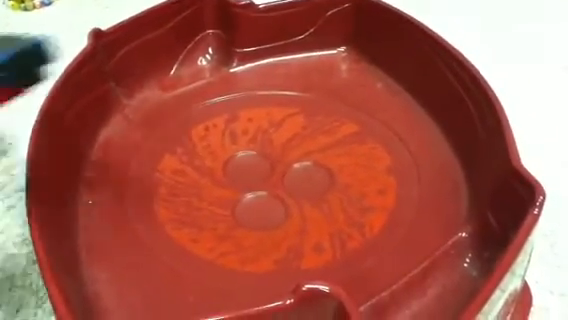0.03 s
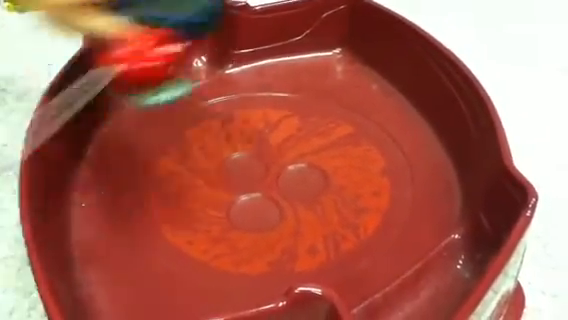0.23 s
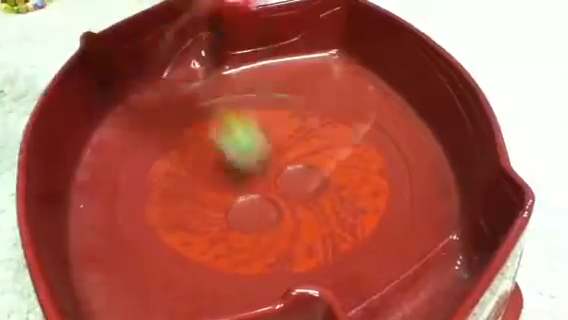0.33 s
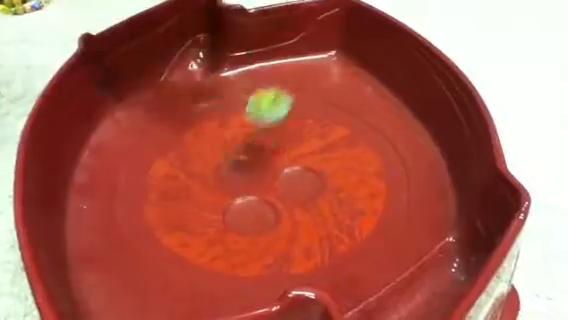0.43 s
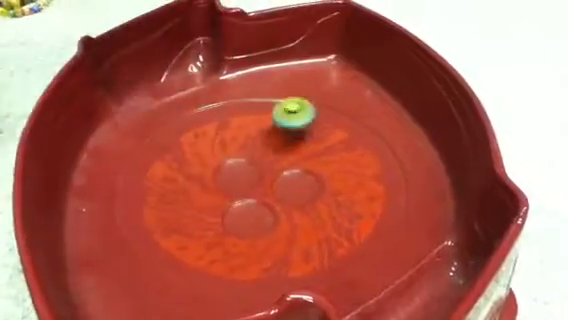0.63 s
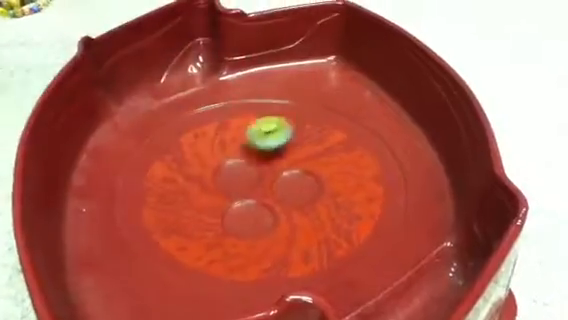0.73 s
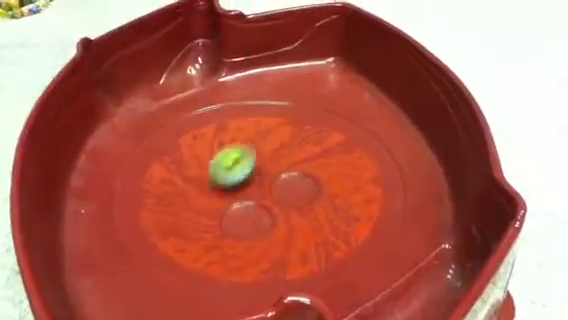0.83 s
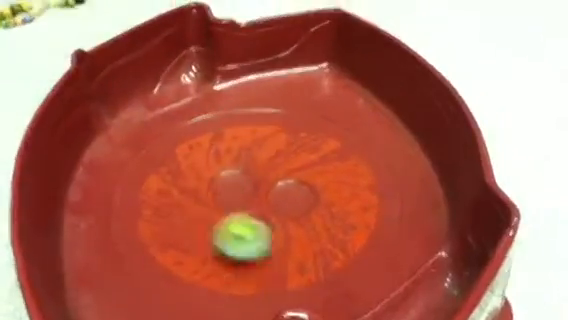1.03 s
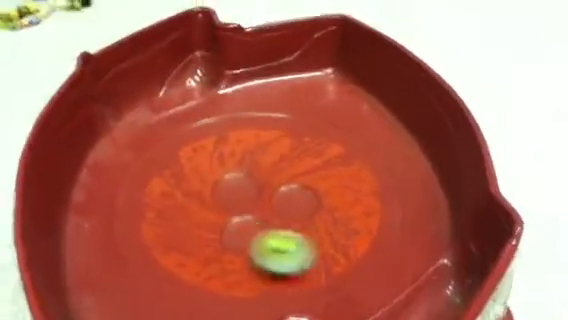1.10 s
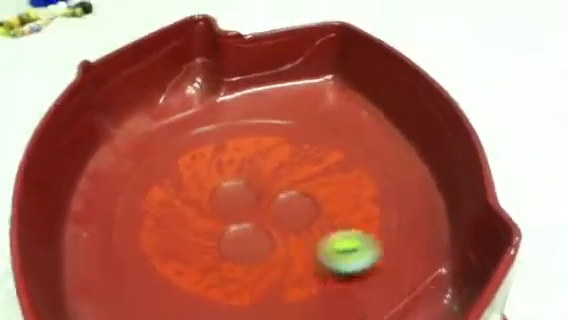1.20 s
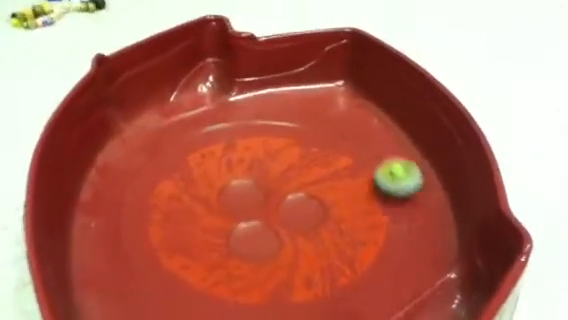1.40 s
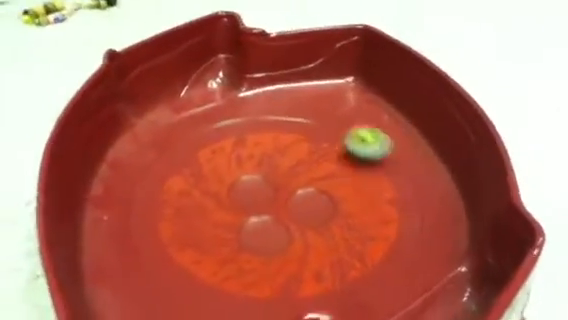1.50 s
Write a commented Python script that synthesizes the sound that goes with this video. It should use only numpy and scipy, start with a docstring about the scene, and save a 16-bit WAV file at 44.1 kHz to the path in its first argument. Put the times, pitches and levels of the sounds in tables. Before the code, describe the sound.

A toy top rips off its launcher, then clacks and spins around a plastic dish.

```python
"""A rising whine and rasp: a ripcord's teeth run through a toy launcher, whose gears then rattle on.
The spinning top drops into a thin plastic dish, bounces ever lower, skitters and circles on its tip.
The dish drums and rumbles, the top's loose parts jingle, its metal wheel rings faintly,
and a small quiet room answers."""
import sys
import numpy as np
from scipy import signal
from scipy.fft import rfft, irfft
from scipy.io import wavfile
from scipy.ndimage import uniform_filter1d

SR = 44100
rng = np.random.default_rng(int(sys.argv[2]) if len(sys.argv) > 2 else 0)


def wrap_up_sound(samples):
    """Save the sound to the file named by the first command line argument, as 16-bit audio."""
    columns = np.atleast_2d(samples).T
    # keep every value between -1 and 1, then stretch to whole-number steps
    tamed = np.clip(columns, -1, 1)
    steps = np.round(tamed * 32767).astype(np.int16)
    wavfile.write(sys.argv[1], SR, steps)


N = 68355
T = np.arange(N) / SR

# spectra of cord rasp and gear snap (frequency [Hz], level [dB])
RASP_SPECTRUM = [(100, -24), (350, -24.5), (700, -21.5), (1200, -5), (2200, -1.5), (4000, 0.5), (6000, -3),
                 (9000, -4), (12500, -13.5), (16000, -33)]
SNAP_SPECTRUM = [(60, -60), (450, -41), (850, -20.5), (1600, 6.5), (2600, -3), (4700, 3), (5400, -2.5),
                 (7000, -1.5), (9500, -4), (12500, -15.5), (16000, -29)]
# tip strikes (time [s], floor boom [dB], shell knock [dB], tick [dB], spot pitch [Hz], wheel [dB])
STRIKES = [(0.425, -6, -15.5, -20.5, 1290, -62), (0.4282, -24, -12.5, -41, 1541, -62),
           (0.4378, -44, -15, -21, 719, -62), (0.6453, -11, -24.5, -26.5, 1232, -51.5),
           (.7760, -19.5, -26, -25.5, 1516, -75), (0.8546, -31, -24.5, -38, 1590, -50),
           (0.8571, -31, -37, -23.5, 1560, -62), (0.874, -28.5, -52, -30, 1090, -57),
           (.9090, -18.5, -26, -26.5, 1145, -53), (0.915, -27, -57, -30, 1090, -48),
           (0.9436, -61, -26, -59, 550, -54), (0.9458, -52, -25, -20.5, 550, -43),
           (0.9552, -38, -26.5, -26, 540, -62), (1.0035, -36, -30, -39, 710, -68),
           (1.010, -58, -28.5, -34.5, 1375, -67), (1.053, -29.5, -20.5, -37, 1215, -55),
           (1.074, -30, -32, -42, 1270, -63), (1.078, -23.5, -26.5, -27.5, 1806, -61),
           (1.087, -61, -25, -26, 1123, -61), (1.096, -26.5, -30, -21.5, 1980, -50.5),
           (1.099, -34, -30.5, -25, 1830, -40), (1.140, -50, -27, -26, 1310, -66),
           (1.181, -55, -29.5, -29, 1290, -70), (1.206, -57, -32.5, -28.5, 1230, -55),
           (1.3751, -31, -24.5, -17, 1230, -46.5), (1.41, -64, -25, -21, 850, -61),
           (1.4149, -43, -24.5, -19, 1454, -43.5), (1.448, -37, -26, -28.5, 803, -68),
           (1.491, -60, -58, -32, 564, -57)]
# modes of the dish and of the top's loose parts (frequency [Hz], level [dB], t60 [s])
DISH_MODES = [(108, -12, .08), (150, -9, .11), (188, -13, .08), (227, -2.5, .115), (262, -9, .1),
              (325, -16, .14), (435, -19, .12), (540, -10, .09), (642, -8, .08), (730, -7, .08),
              (812, -9, .07), (1080, -8, .05), (1230, -6, .045), (1540, -9, .045)]
PART_MODES = [(3970, -6, 0.031), (7120, 1.5, 0.014), (7290, -3, 0.033), (8200, -4, 0.052), (8600, 3, 0.007),
              (9700, -32, 0.042), (12200, -8, 0.08), (12830, -5.5, 0.05), (13400, -23, 0.049),
              (13940, -16, 0.073)]


def undb(db):
    """Decibels to gain."""
    return 10 ** (np.asarray(db) / 20)


def unit(x):
    """Scale to rms 1."""
    return x / np.sqrt(np.mean(x ** 2))


def curve(rows, column=1):
    """Gain along (time [s], level [dB]) rows, fading in before the first."""
    rows = np.array(rows)
    fade_in = np.exp(np.minimum(T - rows[0, 0], 0) * 100)
    return undb(np.interp(T, rows[:, 0], rows[:, column])) * fade_in


def colour(x, spectrum):
    """Filter by (frequency [Hz], level [dB]) points; rms 1."""
    hz, db = np.array(spectrum).T
    bins_hz = np.maximum(np.fft.rfftfreq(N, 1 / SR), 1)
    return unit(irfft(rfft(x) * undb(np.interp(np.log(bins_hz), np.log(hz), db)), N))


def noise(spectrum):
    """Coloured noise, rms 1."""
    return colour(rng.standard_normal(N), spectrum)


def tinted(spectrum, count=40, spread_db=4):
    """Coloured noise with random peaks and dips."""
    hz, db = np.array(spectrum).T
    grid_hz = np.geomspace(hz[0], hz[-1], count)
    grid_db = np.interp(np.log(grid_hz), np.log(hz), db) + spread_db * rng.standard_normal(count)
    return noise(np.c_[grid_hz, grid_db])


def wander(hz):
    """Smooth random drift, rms 1."""
    size = int(SR / hz)
    return unit(uniform_filter1d(uniform_filter1d(rng.standard_normal(N), size), size))


def grains(per_s, spread_db=3.5):
    """Tiny random impacts of unequal size."""
    hits = (rng.random(N) < per_s / SR) * rng.choice([-1, 1], N)
    return hits * undb(spread_db * rng.standard_normal(N))


def fade(start_s, t60_s):
    """Step onset, exponential decay."""
    return (T >= start_s) * np.exp(-np.log(1000) * np.maximum(T - start_s, 0) / t60_s)


def burst(start_s, t60_s, contact_s=0.00037):
    """Decay with its onset rounded by the contact time."""
    return fade(start_s, t60_s) * (1 - np.exp(-np.maximum(T - start_s, 0) / contact_s))


def ring(modes):
    """Impulse response of (frequency [Hz], level [dB], t60 [s]) modes."""
    out = np.zeros(N)
    for hz, db, t60_s in modes:
        t = T[T < 2 * t60_s]
        out[:len(t)] += undb(db) * np.exp(-np.log(1000) * t / t60_s) * np.sin(2 * np.pi * hz * t)
    return out


def through(x, response):
    """Convolve, cut to N."""
    return signal.fftconvolve(x, response)[:N]


def ripcord(jitter=.058, flutter_db=4, bright_hz=1395, mesh_depth=0.37, release_t60_s=0.15):
    """Uneven teeth whine in the housing and rasp while the cord runs."""
    # cord speed (time [s], tooth rate [Hz])
    speed = [(.10, 1143), (.18, 1170), (.213, 1291), (.236, 985.3), (.252, 1246), (.262, 1415),
             (.278, 1710), (.294, 2050), (.335, 2510)]
    # pull on the cord (time [s], rasp [dB], whine [dB])
    pull = [(.07, -78, -71), (.13, -51, -51), (.165, -42.5, -47.5), (.19, -34.5, -28), (.217, -28, -28.5),
            (.242, -20.5, -23), (.258, -22, -15.5), (.295, -17, -23), (.315, -17, -22.5),
            (.331, -15, -24.5), (.348, -30, -59)]
    # tooth harmonics from the fundamental up (level [dB])
    harmonics_db = [6, -0.5, -1.5, 1]
    # housing resonances (frequency [Hz], level [dB], t60 [s])
    housing_modes = [(1220, 3.5, 0.0054), (1320, -2.5, 0.0058), (1620, -19, 0.0088), (2180, -3.5, 0.0128),
                     (2270, -6, 0.025), (2843, 3.5, 0.023), (3400, 8, 0.0083), (3830, -2, 0.019),
                     (4660, -10, 0.016)]
    tooth_hz = np.interp(T, *np.array(speed).T)
    phase = 2 * np.pi * np.cumsum(tooth_hz * (1 + jitter * wander(890))) / SR
    brightness = np.minimum(tooth_hz / bright_hz, 1) ** 10  # overtones grow with speed
    teeth = sum(brightness ** k * undb(db + flutter_db * wander(490)) * np.sin((k + 1) * phase)
                for k, db in enumerate(harmonics_db))
    housing = through(np.gradient(teeth), ring(housing_modes))
    release_s = pull[-1][0]
    pulling = T < release_s
    whine = (housing / np.std(housing[pulling]) + undb(-3.5) * teeth / np.std(teeth[pulling])) / 2 ** .5
    meshing = (1 + mesh_depth * np.cos(phase)) ** 2
    rasp = unit(colour(rng.standard_normal(N) * meshing, RASP_SPECTRUM) * undb(1.5 * wander(220)))
    engaged = pulling + fade(release_s, release_t60_s)
    return engaged * (rasp * curve(pull) + whine * curve(pull, column=2))


def clacks():
    """The launcher clacks: noise bursts, each with its own brightness."""
    # launcher clacks (time [s], level [dB], t60 [s], tilt [dB/octave])
    hits = [(0.091, -47.5, 0.037, -1.5), (0.324, -9.5, 0.068, 3.4), (0.495, -25.5, 0.062, 0.5),
            (0.5533, -6, .013, 5.4), (0.5655, -7, 0.0085, 12)]
    out = np.zeros(N)
    for start_s, level_db, t60_s, tilt in hits:
        spectrum = [(hz, db + tilt * np.log2(hz)) for hz, db in SNAP_SPECTRUM]
        out += undb(level_db) * burst(start_s, t60_s) * noise(spectrum)
    return out


def catches(sigma_s=0.0027, grit_hz=910):
    """The cord catches on the pinion; the housing gives a gritty squeak."""
    # catches (time [s], level [dB], squeak pitch [Hz])
    snags = [(0.2288, -18, 2380), (0.2705, -14, 3640), (0.2925, -12.5, 4080), (0.3272, -23, 4680)]
    out = np.zeros(N)
    for peak_s, db, hz in snags:
        squeak = np.sqrt(2) * np.sin(2 * np.pi * hz * T + wander(grit_hz))
        envelope = undb(db) * np.exp(-.5 * ((T - peak_s) / sigma_s) ** 2)
        out += envelope * (squeak + undb(-3) * noise(RASP_SPECTRUM))
    return out


def freewheel(stop_t60_s=0.15):
    """The released gears coast in a dense rattle."""
    # coasting gears (time [s], level [dB])
    levels = [(.32, -36), (.35, -29), (.39, -40.5), (.42, -31), (.47, -40.5), (.53, -38.5), (.555, -33.5),
              (.59, -42)]
    stop_s = levels[-1][0]
    running = (T < stop_s) + fade(stop_s, stop_t60_s)
    return colour(grains(6000), SNAP_SPECTRUM) * curve(levels) * running


def dish_strikes(floor_below_hz=480, spread_db=2, thud_hz=208.3, lag_s=0.001102):
    """Each landing rings the struck spot; just after, the floor flexes and the dish's modes ring."""
    shapes = np.array([ring([mode]) for mode in DISH_MODES])
    is_floor = np.array(DISH_MODES)[:, 0] < floor_below_hz
    alternating = (-1) ** np.arange(len(DISH_MODES))
    thud = ring([(thud_hz, -3.5, 0.045)])
    out = np.zeros(N)
    for start_s, boom_db, knock_db, _, spot_hz, _ in STRIKES:
        scatter = rng.standard_normal(len(DISH_MODES))
        gains = undb(np.where(is_floor, boom_db - 12, knock_db - 6.5) + spread_db * scatter)
        signs = np.where(is_floor, alternating, -np.sign(scatter[::-1]))
        body = (gains * signs) @ shapes - undb(boom_db) * thud
        strike = ring([(spot_hz, knock_db + 2, .04)]) + np.interp(T - lag_s, T, body)
        i = int(start_s * SR)
        out[i:] += strike[:N - i]
    return out


def dish_wash(knock_t60_s=0.038, hollow_t60_s=0.16):
    """The struck dish's many overlapping modes blur into a knock and a hollow after-ring."""
    # spectra of shell knock and after-ring (frequency [Hz], level [dB])
    shell_spectrum = [(100, -1.5), (220, 9), (380, -4.5), (650, 3.5), (920, 0), (1250, 3.5), (1700, 0),
                      (2200, -5), (2800, -2), (5000, -21.5), (10000, -36)]
    hollow_spectrum = [(60, -1), (150, -2.5), (260, 2.5), (400, -5), (700, -7), (1500, -23), (3000, -49)]
    knock_energy, hollow_energy = np.zeros((2, N))
    for start_s, boom_db, knock_db, *_ in STRIKES:
        knock_energy += (undb(knock_db) * fade(start_s, knock_t60_s)) ** 2
        hollow_energy += (undb(boom_db) ** 2 + undb(knock_db) ** 2) * fade(start_s, hollow_t60_s) ** 2
    hollow = undb(-16) * np.sqrt(hollow_energy) * noise(hollow_spectrum)
    return hollow + np.sqrt(knock_energy) * noise(shell_spectrum)


def parts_jingle(detune=.012, spread_db=4.5):
    """Each landing jingles the top's loose parts, never twice alike."""
    out = np.zeros(N)
    for start_s, _, _, tick_db, _, _ in STRIKES:
        scatter = rng.standard_normal((len(PART_MODES), 2))
        modes = [(hz * (1 + detune * shift), db + tick_db - 15 + spread_db * push, t60_s)
                 for (hz, db, t60_s), (shift, push) in zip(PART_MODES, scatter)]
        i = int(start_s * SR)
        out[i:] += ring(modes)[:N - i]
    return out


def wheel_ring(spread_db=2.5):
    """Landings feed energy into the metal wheel's slowly decaying modes."""
    # wheel modes (frequency [Hz], level [dB], t60 [s])
    modes = [(5497, -9, .6), (5803, -10, .5), (5979, -4, .6), (6290, 1, .6)]
    feeds = np.zeros((len(modes), N))
    for start_s, *_, wheel_db in STRIKES:
        feeds[:, int(start_s * SR)] += undb(wheel_db + spread_db * rng.standard_normal(len(modes))) ** 2
    out = np.zeros(N)
    for (hz, db, t60_s), feed in zip(modes, feeds):
        energy = np.abs(through(feed, fade(0, t60_s) ** 2))
        out += undb(db) * np.sqrt(energy) * np.sin(2 * np.pi * hz * T)
    return out


def tip_ticks(t60_s=0.019):
    """The tip ticks at each contact."""
    # tick spectrum (frequency [Hz], level [dB])
    spectrum = [(500, -10.5), (1500, -34), (4200, 2.5), (6400, -5), (7400, -6.5), (7900, 0.5), (8500, 3),
                (10500, -7.5), (12700, -18), (16000, -35)]
    return sum(undb(tick_db) * burst(start_s, t60_s) * tinted(spectrum)
               for start_s, _, _, tick_db, _, _ in STRIKES)


def shaken(modes, force, travel_db=3, travel_hz=18):
    """Modes driven by tiny impacts; each swells and fades as the tip travels."""
    out = np.zeros(N)
    for hz, db, t60_s in modes:
        drive = grains(2000) * force * undb(travel_db * wander(travel_hz))
        out += undb(db) * unit(through(drive, ring([(hz, 0, t60_s)])))
    return unit(out)


def rolling(spin_hz=76.8, spin_depth=0.36, rattle_db=4.5):
    """The tip chatters over the plastic once a turn, shaking the dish and rattling the top."""
    # running tip (time [s], rumble [dB], hiss [dB])
    levels = [(.78, -108, -95), (.88, -55.5, -83), (.98, -47.5, -50), (1.04, -58, -82), (1.10, -42.5, -51),
              (1.22, -38, -42), (1.29, -39.5, -45.5), (1.355, -32.5, -37.5), (1.40, -39.5, -60),
              (1.47, -33, -41.5), (1.55, -37, -47)]
    # spectra of dish rumble and tip hiss (frequency [Hz], level [dB])
    rumble_spectrum = [(60, 0), (140, -10), (230, -21), (450, 0), (800, 1.5), (1300, -4), (1900, -11.5),
                       (4000, -37)]
    hiss_spectrum = [(1000, 1), (2500, 0.5), (4500, -6.5), (6600, -1), (8400, -5), (11500, -14),
                     (12600, -11), (14000, -10), (15500, -38)]
    # coupling of the tip to the dish and to the loose parts (frequency [Hz], gain [dB])
    dish_coupling = [(100, -36), (230, -0.5), (430, 16), (800, 4.5), (1500, -4)]
    parts_coupling = [(4000, -11), (7400, -21), (8300, 25), (9300, -7), (12500, -4), (14000, -1)]
    pressure = 1 + spin_depth * np.sin(2 * np.pi * spin_hz * T)
    dish = colour(grains(3500) * pressure, rumble_spectrum)
    dish += undb(1.5) * colour(shaken(DISH_MODES, pressure), dish_coupling)
    rattle = pressure * undb(rattle_db * wander(190))
    top = colour(grains(12000) * rattle, hiss_spectrum)
    top += undb(-5) * colour(shaken(PART_MODES, rattle), parts_coupling)
    return unit(dish) * curve(levels) + unit(top) * curve(levels, column=2)


def scene(room_db=-16, room_gap_s=0.0074, room_t60_s=0.2, air_db=-51):
    """Launcher and top in a small room."""
    # spectra of room tail and background air (frequency [Hz], level [dB])
    room_spectrum = [(100, 11.5), (400, 5.1), (2000, 0.43), (6000, 3.6), (16000, 2)]
    air_spectrum = [(25, 22.5), (110, 8), (300, 1), (700, -7.5), (3500, -8.5), (9000, -13), (16000, -26)]
    launcher = ripcord() + freewheel() + catches() + clacks()
    bounces = dish_strikes() + parts_jingle() + wheel_ring() + tip_ticks() + dish_wash()
    direct = launcher + bounces + rolling()
    tail = noise(room_spectrum) * fade(room_gap_s, room_t60_s)
    room = through(direct, tail / np.sqrt(np.sum(tail ** 2)))
    return (direct + undb(room_db) * room + undb(air_db) * noise(air_spectrum))[None]


def record(dry, low_cut_hz=115, ceiling=.72, high_cut_hz=15400):
    """The microphone thins the deep bass, rounds the loudest peaks and cuts the highest treble."""
    thin = signal.sosfilt(signal.butter(2, low_cut_hz, "high", fs=SR, output="sos"), dry)
    soft = thin / (1 + (thin / ceiling) ** 8) ** (1 / 8)
    return signal.sosfilt(signal.ellip(8, .2, 70, high_cut_hz, fs=SR, output="sos"), soft)


dry = scene()
out = record(dry)
wrap_up_sound(out)
```